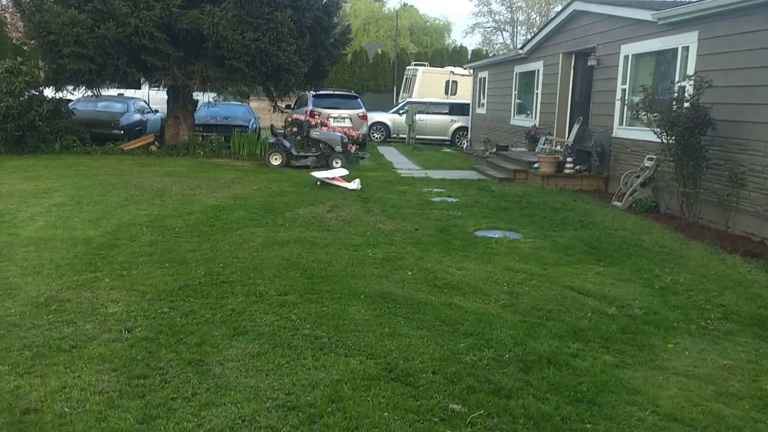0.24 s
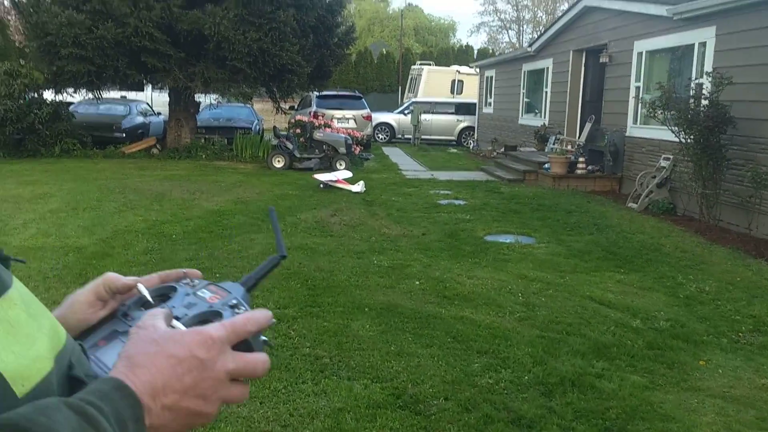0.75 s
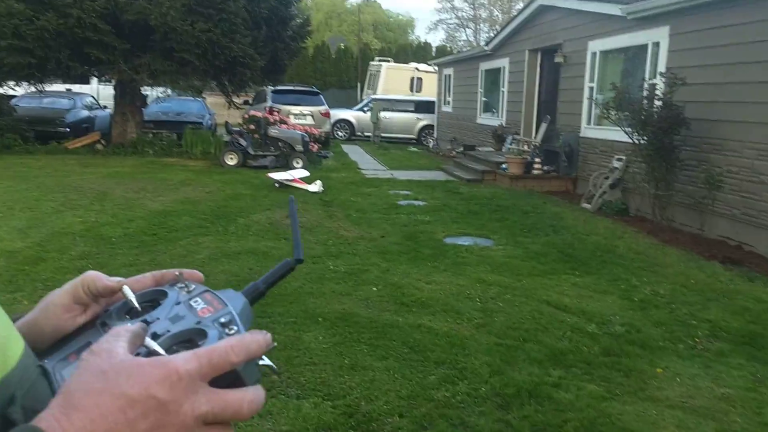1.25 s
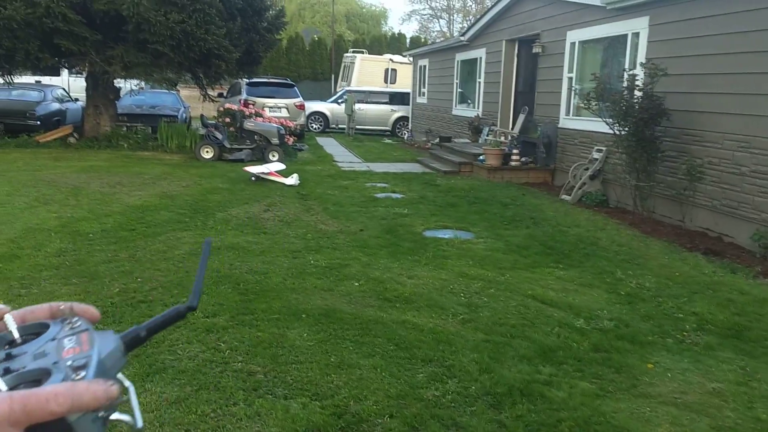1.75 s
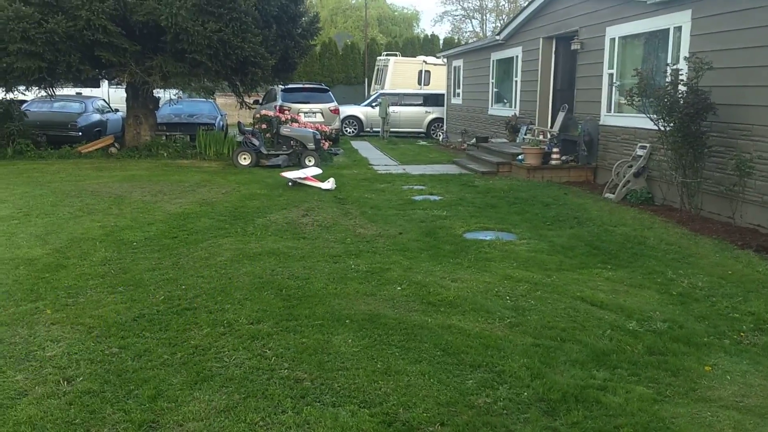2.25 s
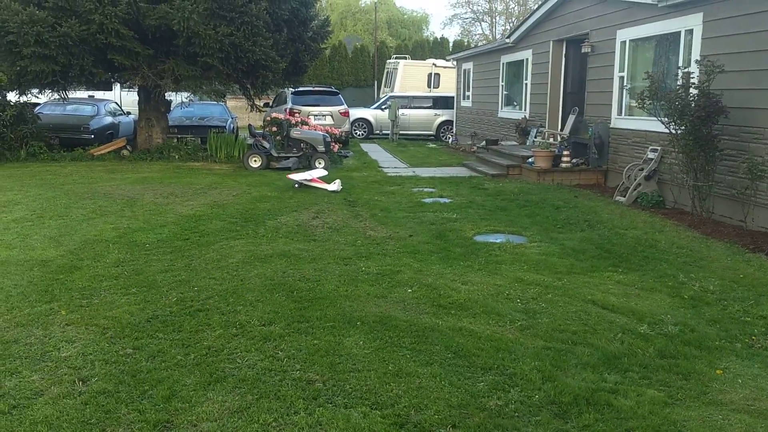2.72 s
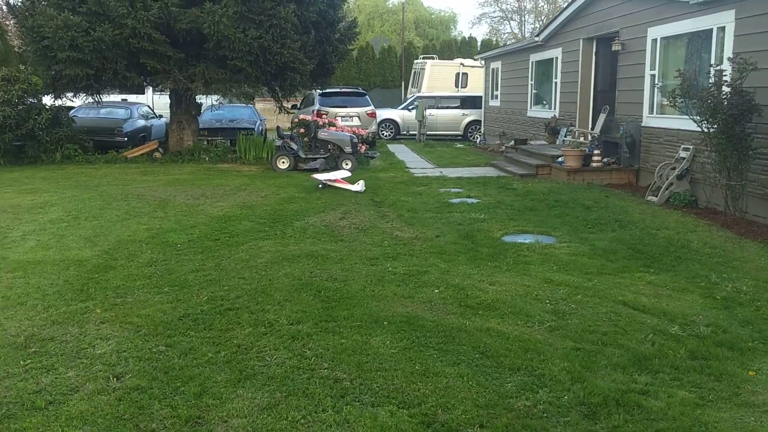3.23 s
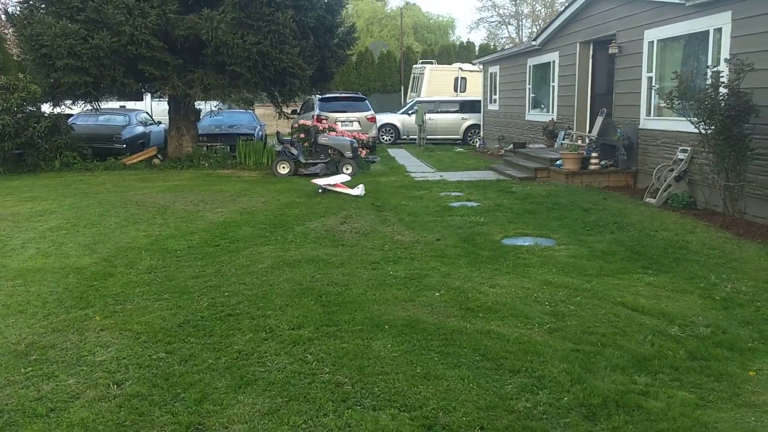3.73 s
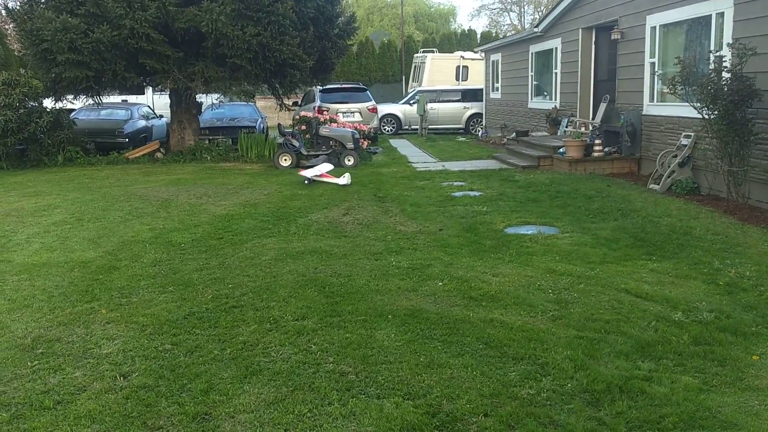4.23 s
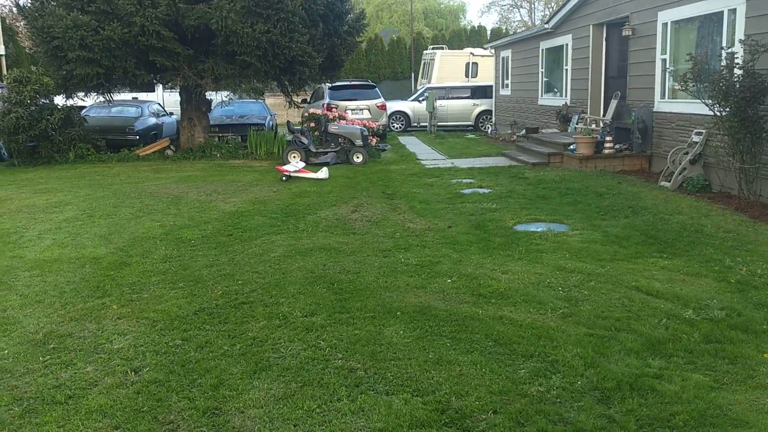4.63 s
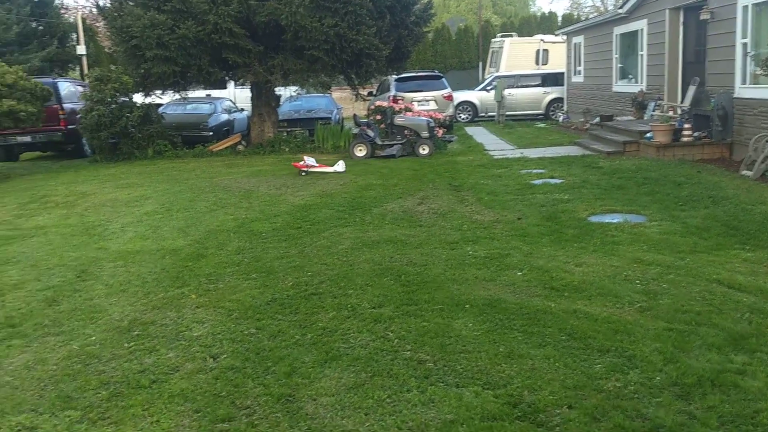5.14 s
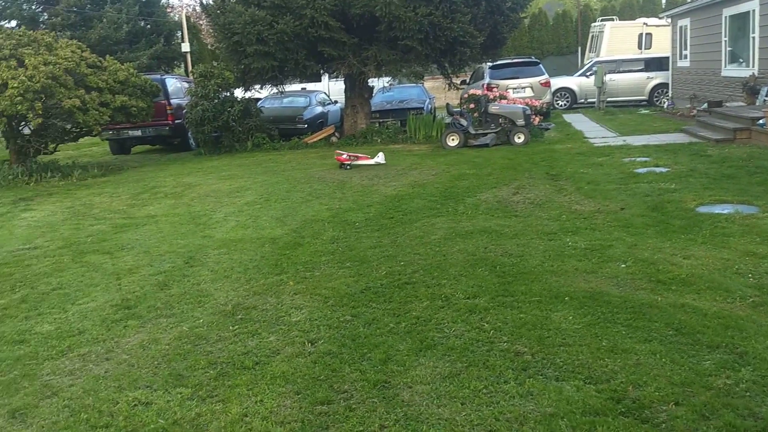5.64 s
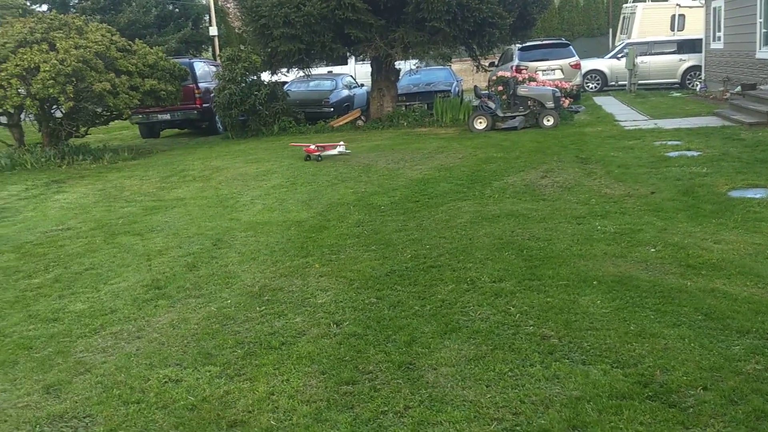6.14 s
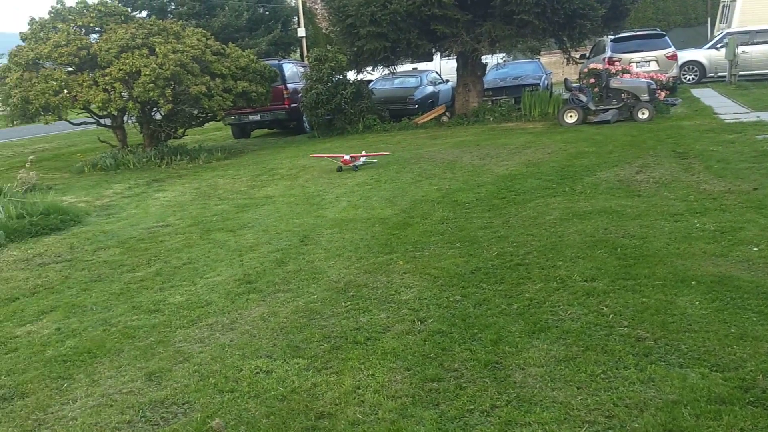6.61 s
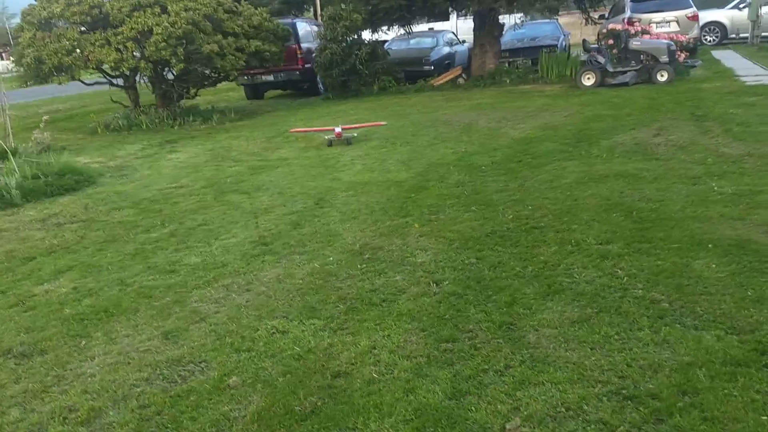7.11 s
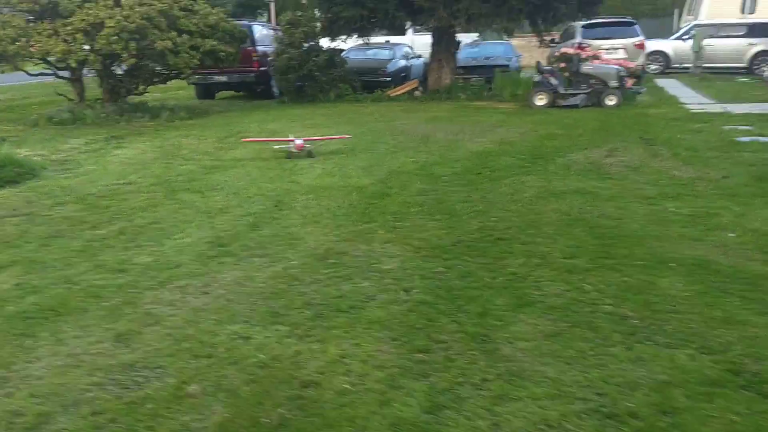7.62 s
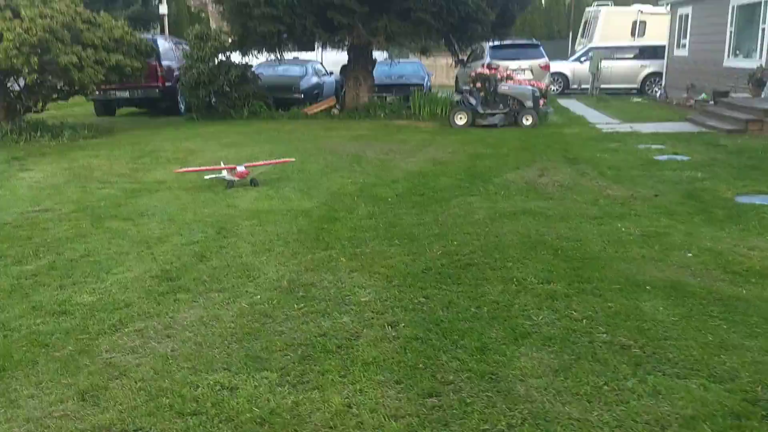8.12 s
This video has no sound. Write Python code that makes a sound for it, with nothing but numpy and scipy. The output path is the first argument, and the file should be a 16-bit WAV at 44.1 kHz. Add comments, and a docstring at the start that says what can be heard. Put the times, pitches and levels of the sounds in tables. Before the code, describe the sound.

A small electric model plane's propeller hums and buzzes with a thin high motor whine, its pitch rising and falling, while fingers knock hard on the phone.

```python
"""On a lawn, a small electric model plane stands side-on, nose turned slightly away from a hand-held phone.
It swings round to face the phone and turns past; its two-blade propeller hums, slaps the air and chops its noise.
The motor sings at multiples of shaft speed and its speed controller whines, beating with the commutation.
Fingers rub and knock on the phone, ringing its case, over brief raspy chirps and a soft outdoor rumble.
The hardest knocks make the phone's gain control duck and slowly recover."""
import sys
import numpy as np
from scipy import signal
from scipy.fft import rfft, irfft, next_fast_len
from scipy.io import wavfile
from scipy.ndimage import uniform_filter1d

SR = 44100
rng = np.random.default_rng(int(sys.argv[2]) if len(sys.argv) > 2 else 0)


def wrap_up_sound(samples):
    """Save the sound to the file named by the first command line argument, as 16-bit audio."""
    columns = np.atleast_2d(samples).T
    # keep every value between -1 and 1, then stretch to whole-number steps
    tamed = np.clip(columns, -1, 1)
    steps = np.round(tamed * 32767).astype(np.int16)
    wavfile.write(sys.argv[1], SR, steps)


N = 369116
T = np.arange(N) / SR
FREQS = np.arange(N // 2 + 1) * SR / N

# Outdoor rumble spectrum. Each row: frequency in Hz, relative level in dB.
YARD_SPECTRUM = [(25, -22.5), (45, -15), (70, 2.5), (120, -2.5), (220, 4.5), (500, -2.5), (900, -17),
                 (2000, -29.5), (6000, -46.5), (16000, -31.5)]
# Brief high chirps. Each row: peak time in seconds, peak level in dB, centre pitch in Hz.
CHIRPS = [(3.14, -51, 3400), (4.35, -35, 3470), (4.69, -37, 3520), (5.421, -35, 3470), (5.95, -36, 3600),
          (6.387, -32, 3560)]
# Finger strokes on the phone. Each row: centre in seconds, half length in seconds, level in dB.
STROKES = [(0.137, 0.035, -59), (0.55, 0.014, -57), (0.83, 0.11, -53), (0.96, 0.018, -44),
           (7.145, 0.047, -47.5), (7.492, 0.02, -48.5), (7.332, 0.043, -48), (7.538, 0.14, -50.5),
           (7.73, 0.06, -50.5), (8.2, 0.33, -59.5), (8.36, 0.033, -46)]
# Spectrum of rubbing fingers. Each row: frequency in Hz, relative level in dB.
RUBBING_SPECTRUM = [(50, -34), (200, -4.5), (400, -5), (800, 4.5), (1400, 0.5), (2500, -20.5), (6000, -19),
                    (16000, -65)]
# Spectrum of the sleeve swish. Each row: frequency in Hz, relative level in dB.
SLEEVE_SPECTRUM = [(100, -1.5), (300, 5), (1100, -2.5), (1900, -14.5), (2800, -1.5), (5000, -5),
                   (9000, -13.5), (16000, -9)]
# Knocks on the phone. Each row: start in seconds, peak level of the body in dB, body pitch in Hz, own ring in dB,
# case ring in dB, tick in dB, left minus right in dB. Rings are mixed against the push, the tick against the body.
KNOCKS = [(.105, -33, 487, -4, -12, -45, 0), (0.712, -36, 400, -8, -15, -47.5, 0),
          (0.9958, -9.5, 2900, 11, -30, -34, -11), (0.9955, -9.5, 348, -15, -24, -46, -6.5),
          (0.9947, -15.5, 990, 4, -16.5, -44, -3), (1.0079, -0.5, 640, -32, -19.5, -60.5, -6),
          (1.446, -28.5, 177, -12.5, -16, -60, -15), (1.6551, -10, 730, -26, -24, -50, 6.5),
          (6.191, -32.5, 900, -11, -15, -15, 0), (7.242, -40, 303, -5, -20, -66, 9),
          (7.2628, -14.5, 1950, -7, -49, 1.5, 3.5), (7.358, -37, 420, -13, -16, -45, 6),
          (7.534, -30, 665, -4, -20, -37, 5), (7.638, -20.5, 900, -12, -22.5, -24.5, 2.5),
          (7.7755, -21, 2180, -6, -37, 6.5, 0), (7.78, -29, 1900, 1, -31, -15, 8),
          (7.785, -31, 1500, 0, -35, -16, 5), (7.799, -24, 1700, -3, -35, -6, 0),
          (7.8029, -14, 2600, -33, -30, 0.5, -15.5), (7.816, -22, 1900, -12, -37, 7, 21),
          (7.8205, -8, 1700, -3, -48, 1, 2), (7.8438, -15.5, 455, -10, -18, 0, -16),
          (7.861, -10.5, 735, -2, -20, -22, 1), (7.868, -19.5, 350, 25, -25, -55, 6),
          (7.959, -38, 704, -8, -18, -45, -2), (8.14, -17.5, 480, -11, -28, -17, 5),
          (8.21, -34, 1100, -11, -14, -35, 2)]
# Phone case modes. Each row: pitch in Hz, relative level in dB, 60 dB decay time in seconds.
CASE_MODES = [(351, -7, 0.013), (700, -8, 0.057), (1030, 4.5, 0.091), (1630, 5, 0.15)]
# Shell modes in the tick of a knock. Each row: pitch in Hz, relative level in dB, 60 dB decay time in seconds.
SHELL_MODES = [(3100, -13.5, 0.0099), (5660, -13.5, 0.004), (10500, -17, .001), (14500, -9, 0.0012)]

# Throttle, before smoothing and wander. Each row: time in seconds, shaft speed in turns per second.
SHAFT_SPEED = [(0.0, 91.4), (0.26, 89.7), (0.72, 93.9), (1.23, 92.6), (1.68, 94.9), (2.17, 93.6),
               (2.41, 101.8), (2.68, 107.3), (2.97, 101.7), (3.48, 98.8), (3.87, 118.8), (4.14, 122.3),
               (4.4, 117.1), (4.98, 102.2), (5.16, 99.9), (5.54, 100.3), (5.94, 105.3), (6.31, 103.6),
               (6.76, 89.6), (7.2, 82.1), (7.98, 82.5), (8.37, 99.1)]
# Plane's heading. Each row: time in seconds, nose angle in degrees off the line to the phone.
NOSE_ANGLE = [(0, 128), (4.3, 102.5), (5.1, 88), (5.6, 80.5), (5.95, 46.5), (6.4, 38), (6.7, 24), (7.3, 0),
              (7.7, -3), (8.1, -20), (8.25, -28), (8.37, -46)]
# Radiation to each side at cruise speed, before mix trims. Each row: angle off the nose in degrees, blade tone in dB,
# buzz in dB, hiss in dB, cowl rasp in dB against the buzz, motor song in dB against the buzz.
DIRECTIVITY = [(0, -55, -53, -41.5, -34, -9), (19.5, -59.5, -45.5, -44.5, 5, -3),
               (35.3, -52, -46.5, -49.5, 7, 1.5), (51.6, -43, -49.5, -56, 7, 2),
               (80.6, -41, -49.5, -57, 8.5, 2.5), (114, -43, -43, -56, -20.5, -0.5)]
# Plane's place between the ears. Each row: time in seconds, left minus right in dB.
PLANE_PAN = [(0, -1), (1, -4), (1.8, -1), (3.2, -2.5), (4.7, -1), (5.7, -3.5), (6.7, -1), (7.3, -1.5),
             (8.37, -1.5)]
# Phase lead of the left port for sound from the plane. Each row: frequency in Hz, lead in radians.
LEFT_PORT_PHASE = [(0, 0), (1700, -.6), (2180, -3.14), (2750, -6), (3450, -6.4), (4330, -9.42), (8700, -22),
                   (9600, -25.1), (10300, -25.2), (10950, -28.3), (16000, -42.9)]
# Propeller harmonics. Each row: multiple of shaft speed, relative level in dB.
PROP_ORDERS = [(1, -32.5), (2, 0), (3, -10.5), (4, -21)]
# Motor song harmonics. Each row: multiple of shaft speed, relative level in dB.
MOTOR_ORDERS = [(7, -18.5), (16, -20), (17, -24.5), (18, -17.5), (21, -12.5), (22, -9), (23, -11.5),
                (25, -13.5), (26, -7), (27, -13.5), (28, -13), (29, -15.5), (30, -13.5), (31, -19.5),
                (32, -12.5), (34, -16), (35, -17), (36, -12.5), (38, -11.5), (40, -30.5), (44, -16),
                (46, -19), (48, -27.5)]
# Magnet song, centred on 14 cycles a turn. Each row: multiple of shaft speed, relative level in dB.
MAGNET_ORDERS = [(13, -9), (14, -1), (15, -9.5)]
# Magnet song over time. Each row: time in seconds, level in dB.
MAGNET_LEVEL = [(0, -69.5), (2.1, -69.5), (2.8, -61), (3.58, -65), (3.8, -47), (4.1, -45), (4.25, -46),
                (4.42, -47), (4.72, -47.5), (4.92, -61), (5.3, -66), (5.9, -61), (6.5, -61.5), (7.2, -55.5),
                (7.7, -58.5), (8.0, -55), (8.37, -53.5)]
# Drone of the middle harmonics. Each row: multiple of shaft speed, relative level in dB.
DRONE_ORDERS = [(8, -8.5), (9, -4.5), (10, -1), (11, -2.5), (12, -3.5)]
# Drone over time. Each row: time in seconds, level in dB.
DRONE_LEVEL = [(0, -69.5), (1, -74.5), (1.6, -59), (2.3, -63.5), (2.7, -61.5), (3.0, -57.5), (3.6, -58.5),
               (4.1, -69), (4.5, -65.5), (4.9, -61.5), (6.3, -61.5), (7, -67), (8.37, -64.5)]
# Foam airframe resonances. Each row: pitch in Hz, width in Hz, boost in dB mixed on top of the direct tone.
AIRFRAME = [(120.5, 5.2, 13.5), (363, 16, -1.5), (759, 19, 7.5), (935, 35, -4.5), (1596, 56, -2),
            (2420, 54, 7.5), (3410, 52, 2), (3885, 47, 3.5)]
# Pitches where reflections cancel the direct tone. Each row: pitch in Hz, width in Hz, depth in dB.
NULLS = [(224.3, 20, 8), (326, 28.5, 11)]
# Blade buzz spectrum. Each row: frequency in Hz, gain in dB.
BUZZ_SPECTRUM = [(300, -34), (650, -13.5), (1000, -14.5), (1320, -24), (1700, -6.5), (2050, -7), (2450, 3),
                 (3100, -5.5), (3800, -5), (5200, -3), (6200, -11.5), (9000, -25.5), (15000, -35)]
# Propeller wash spectrum. Each row: frequency in Hz, relative level in dB.
WASH_SPECTRUM = [(300, -15), (900, -0.5), (1300, -11.5), (1700, -2), (2100, -4.5), (2450, 3.5), (3000, -1),
                 (3600, 1.5), (4500, 2), (6000, -7), (7400, -12), (9000, -13.5), (16000, -21.5)]
# Air hiss spectrum. Each row: frequency in Hz, relative level in dB.
HISS_SPECTRUM = [(500, -21.5), (2600, 4.5), (5000, 0), (7500, -7.5), (9800, -14), (11000, -4),
                 (12700, -1.5), (14300, -5), (16000, -2.5)]
# Strips of wash that flare up: centre frequencies in Hz.
PATCH_HZ = [2600, 3200, 3500]
# Speed controller. Each row: time in seconds, switching rate in Hz.
SWITCHING_RATE = [(0.0, 7831.5), (2.38, 7813), (6.2, 7819.5), (6.36, 7851), (8.37, 7843)]
# Controller whine before flutter. Each row: time in seconds, level in dB.
WHINE_LEVEL = [(0, -58), (.2, -55.5), (.45, -64.5), (.75, -47.5), (1, -62), (2, -54.5), (2.5, -61),
               (2.9, -58.5), (3.15, -51), (3.6, -54), (3.9, -59), (4.15, -52.5), (4.7, -55), (5.15, -50.5),
               (5.5, -55.5), (5.8, -50.5), (6.2, -54), (6.35, -49), (6.7, -44.5), (7, -52.5), (7.75, -53.5),
               (8.1, -44.5), (8.37, -49.5)]
# Commutation whistle before flutter. Each row: time in seconds, level in dB.
WHISTLE_LEVEL = [(0, -55.5), (2.1, -64), (2.4, -61), (2.7, -49), (3.1, -56), (3.5, -54), (3.7, -45.5),
                 (4.2, -59), (4.7, -52.5), (5.2, -59), (5.75, -47.5), (6.05, -46.5), (6.5, -75), (7.1, -53),
                 (7.6, -53), (8.05, -51.5), (8.37, -59)]

SPIN_UP_S, CRUISE_HZ = .15, 100  # throttle smoothing window; reference shaft speed
TONE_DB_PER_OCT, BUZZ_DB_PER_OCT, HISS_DB_PER_OCT = 31, 19.5, 14.5  # growth with shaft speed
CHOP, CHOP_SCATTER_DB = .32, 2  # depth of blade chopping heard side-on; its quick scatter in the wash
COMMUTATIONS_PER_TURN = 42
GRIP_DB = -61.5  # the resting hand
SWISH_S, SWISH_HALF_S = .955, .024
RING_CYCLES = 17  # a struck spot falls 60 dB in this many cycles of its own pitch
OPEN_HZ = 5060  # extra treble reach of the hardest contact
TOP_HZ = 15850  # upper limit of the phone


def undb(db):
    """Decibels to gain."""
    return 10 ** (np.asarray(db) / 20)


def curve(table):
    """Glide through a table of (time, value), sample by sample."""
    s, value = np.transpose(table)
    return np.interp(T, s, value)


def walk(rate):
    """Smooth random wander with a spread near 1, taking `rate` new values a second."""
    step = int(SR / rate)
    held = np.repeat(rng.standard_normal(N // step + 2), step)
    held = held[rng.integers(step):][:N]
    return 1.353 * uniform_filter1d(uniform_filter1d(held, step), step)


def swell(s, half_length_s):
    """Bell-shaped envelope around time s."""
    return np.exp(-((T - s) / half_length_s) ** 2)


def colour(x, spectrum):
    """Filter x by a curve of (Hz, dB) points, then bring it to rms 1."""
    size = next_fast_len(N, True)
    hz, db = np.transpose(spectrum)
    bins_hz = np.arange(size // 2 + 1) * SR / size
    gain = undb(np.interp(np.log(bins_hz + 1), np.log(hz), db))
    y = irfft(rfft(x, size) * gain, size)[..., :N]
    return y / np.sqrt(np.mean(y ** 2))


def band(x, lo_hz, hi_hz):
    """Four-pole band-pass."""
    edges = [lo_hz, min(hi_hz, SR / 2 - 100)]
    return signal.sosfilt(signal.butter(2, edges, "band", fs=SR, output="sos"), x)


def air(spread):
    """Noise at two ports: a common part and a part of their own."""
    return rng.standard_normal(N) + spread * rng.standard_normal((2, N))


def add(out, s, sound):
    """Mix a sound in at time s."""
    start = int(s * SR)
    out[..., start:start + sound.shape[-1]] += sound[..., :N - start]


def yard(level_db):
    """Soft, distant outdoor rumble; moving air stirs each port on its own."""
    return undb(level_db + 0.57 * walk(4.1)) * colour(air(26.0), YARD_SPECTRUM)


def chirps(length_s, width_hz):
    """Brief, slightly raspy chirps: narrow noise under a quick rise and decay."""
    out, t = np.zeros(N), T[:SR // 15]
    for s, peak_db, hz in CHIRPS:
        rasp = band(rng.standard_normal(len(t)), hz - width_hz, hz + width_hz)
        chirp = rasp * t * np.exp(-t / length_s)
        add(out, s - length_s, undb(peak_db) * chirp / abs(chirp).max())
    return out


def handling(swish_db):
    """Fingers slide in uneven grains of noise; a sleeve swishes past just before the first big knock."""
    pressure = undb(GRIP_DB) + sum(undb(db) * swell(s, half_s) for s, half_s, db in STROKES)
    rub = pressure * colour(air(0.22) * undb(3.0 * walk(130)), RUBBING_SPECTRUM)
    cloth = colour(air(0.36) * undb(1.2 * walk(320)), SLEEVE_SPECTRUM)
    return rub + undb(swish_db) * swell(SWISH_S, SWISH_HALF_S) * cloth


def modes(table, t):
    """Decaying sines of a struck object."""
    return sum(undb(db - 60 * t / t60) * np.sin(2 * np.pi * hz * t) for hz, db, t60 in table)


def knocks(lag_s):
    """A short push rings at its own pitch and in the case, with a shell tick; the left port hears it later."""
    out, t = np.zeros((2, N)), T[:SR // 10]
    impulse = signal.unit_impulse(len(t))
    tick = impulse + modes(SHELL_MODES, t)
    case = modes(CASE_MODES, t)
    for s, peak_db, hz, own_db, case_db, tick_db, pan_db in KNOCKS:
        # a soft fingertip cushions the treble
        reach_hz = hz * 2 + OPEN_HZ * undb(min(tick_db, 0))
        push = band(band(impulse, hz / 3, hz * 1.92), 90, reach_hz)
        own = band(modes([(hz, 0, RING_CYCLES / hz)], t), hz / 3, hz * 2)
        ring = signal.fftconvolve(push, case)[:len(t)]
        body = push / abs(push).max() + undb(own_db) * own + undb(case_db) * ring / abs(ring).max()
        blow = body / abs(body).max() + undb(tick_db) * tick
        late = np.pad(blow, (int(lag_s * SR), 0))[:len(t)]
        gains = undb(peak_db + np.array([[pan_db], [-pan_db]]) / 2)
        add(out, s, gains * np.array([late, blow]))
    return out


def controller(turns, side_on):
    """Switched current whines, ripples with the shaft and beats with the whistle of the commutations."""
    carrier = 2 * np.pi * np.cumsum(curve(SWITCHING_RATE)) / SR
    angle = 2 * np.pi * turns
    commutation = COMMUTATIONS_PER_TURN * angle
    beat = carrier - 2 * commutation
    ripple = 1 + 0.24 * np.cos(angle) + 0.31 * np.cos(2 * angle) + 0.21 * walk(150)

    whine_gain = undb(curve(WHINE_LEVEL) + 1.0 * walk(6) + 1.7 * walk(25))
    whine = whine_gain * ripple * np.sin(carrier + 0.27 * walk(19))
    whistle = undb(curve(WHISTLE_LEVEL) + 2.8 * walk(40)) * np.sin(commutation)
    # the difference tone drops as the shaft speeds up
    falling = undb(-61 + 3 * side_on + 1.6 * walk(9.3)) * np.sin(carrier - commutation)
    falling = band(falling, 3350, 3700)
    climbing = band(undb(-51 + 1.2 * walk(18)) * np.sin(beat), 1620, 2200)
    overtone = band(undb(-61.5 + 2 * walk(14)) * np.sin(2 * beat), 1680, 3800)
    return np.sqrt(2) * (whine + ripple * (whistle + falling + climbing + overtone))


def patches(x, depth_db, width_hz):
    """Neighbouring strips of noise brighten and fade, each on its own."""
    out = x
    for hz in PATCH_HZ:
        flare = undb(depth_db * walk(11)) - 1
        out = out + flare * band(x, hz - width_hz / 2, hz + width_hz / 2)
    return out


def echoes(x, echo_db, drift_s):
    """House wall and parked cars reflect the plane; the paths drift, so each partial fades on its own."""
    delays_s = [.011, .027, .043]
    return x + undb(echo_db) * sum(np.interp(T - d - drift_s * walk(1.436), T, x) for d in delays_s)


def buzz(turns, cowl_db, weak_blade, cowl_weak_blade, cowl_hz, cowl_width_hz):
    """Each blade slaps the air once a turn, one harder; the cowl rasps mostly to the harder slap."""
    def slap(lead):
        return np.exp(-(((turns + lead) % 1 - .5) / 0.0042) ** 2)

    def slaps(weak):
        uneven = 1 + .3 * walk(250)
        return echoes((slap(0) + weak * slap(.5)) * uneven, echo_db=-1.0, drift_s=.00005)

    rasp = band(slaps(cowl_weak_blade), cowl_hz - cowl_width_hz / 2, cowl_hz + cowl_width_hz / 2)
    return colour(slaps(weak_blade), BUZZ_SPECTRUM) + undb(cowl_db) * rasp / rasp.std()


def tones(orders, turns, shaft_hz, waver_db):
    """Shaft harmonics, each swelling as it sweeps through an airframe resonance and sinking in a null."""
    out = 0
    for multiple, db in orders:
        k = round(multiple)
        tone_hz = k * shaft_hz

        def nearness(hz, width):
            return 1 / (1 + (2 * (tone_hz - hz) / width) ** 2)

        boost = 1 + sum(undb(peak_db) * nearness(hz, width) for hz, width, peak_db in AIRFRAME)
        dip_db = sum(depth_db * nearness(hz, width) for hz, width, depth_db in NULLS)
        gain = boost * undb(db - dip_db + waver_db * walk(13))
        out = out + gain * np.sin(2 * np.pi * (k * turns + rng.random()))
    return np.sqrt(2) * out


def plane():
    """Propeller, motor and chopped air follow shaft speed and heading; the left port hears them phase-shifted."""
    window = int(SPIN_UP_S * SR)
    shaft_hz = uniform_filter1d(curve(SHAFT_SPEED), window, mode="nearest") * (1 + 0.001185 * walk(20))
    turns = np.cumsum(shaft_hz) / SR
    octaves = np.log2(shaft_hz / CRUISE_HZ)
    off_nose = abs(curve(NOSE_ANGLE))
    side_on = abs(np.sin(np.radians(off_nose))) ** 3

    degrees, *columns = np.transpose(DIRECTIVITY)
    tone_db, buzz_db, hiss_db, cowl_db, song_db = (np.interp(off_nose, degrees, c) for c in columns)
    tone_db = tone_db + TONE_DB_PER_OCT * octaves
    buzz_db = buzz_db + BUZZ_DB_PER_OCT * octaves
    hiss_db = hiss_db + HISS_DB_PER_OCT * octaves

    # the blade tone is steadier than the other propeller harmonics
    hum = undb(tone_db - 1.0) * tones(PROP_ORDERS[1:2], turns, shaft_hz, waver_db=0.97)
    hum += undb(tone_db - 1.5) * tones(PROP_ORDERS[:1] + PROP_ORDERS[2:], turns, shaft_hz, waver_db=3.0)
    magnets = undb(curve(MAGNET_LEVEL)) * tones(MAGNET_ORDERS, turns, shaft_hz, waver_db=1.2)
    drone = undb(curve(DRONE_LEVEL)) * tones(DRONE_ORDERS, turns, shaft_hz, waver_db=2.5)
    motor = undb(song_db - 8.0) * tones(MOTOR_ORDERS, turns, shaft_hz, waver_db=3.5)
    slaps = undb(-5.5) * buzz(turns, cowl_db, weak_blade=0.75, cowl_weak_blade=0.14,
                              cowl_hz=2573, cowl_width_hz=530)

    # turbulence pulses as each blade swings towards the phone
    chop = 1 + CHOP * side_on * np.cos(4 * np.pi * turns)
    gusts = chop * undb(CHOP_SCATTER_DB * walk(260))
    wash = patches(colour(air(0.056) * gusts, WASH_SPECTRUM), depth_db=2.6, width_hz=420)
    wash = undb(-4.3 + 1.1 * walk(22)) * wash
    hiss = undb(hiss_db + 3.0 + 0.4 * walk(6.0)) * colour(air(0.054) * chop, HISS_SPECTRUM)

    sound = hum + magnets + drone + undb(buzz_db) * (motor + slaps + wash) + hiss
    sound = sound + controller(turns, side_on)
    phase = np.interp(FREQS, *np.transpose(LEFT_PORT_PHASE))
    left = irfft(rfft(sound[0]) * np.exp(1j * phase), N)
    pan_db = curve(PLANE_PAN)
    return np.array([left, sound[1]]) * undb(np.array([pan_db, -pan_db]) / 2)


def scene():
    """Mix the yard, the chirps, the hands on the phone and the plane."""
    return (yard(level_db=-55) + chirps(length_s=0.0041, width_hz=185) + handling(swish_db=-35.5)
            + knocks(lag_s=.00013) + plane())


def record(dry):
    """Gain control reacts late to peaks and recovers steadily; what gets past it clips; the top is cut."""
    # the microphone's wind filter, 75 Hz
    dry = signal.sosfilt(signal.butter(2, 75, "high", fs=SR, output="sos"), dry)
    threshold_db, recovery_db_per_s, lag_s = -16.5, 15.5, .0205
    over_db = np.maximum(20 * np.log10(abs(dry).max(axis=0) + 1e-9) - threshold_db, 0)
    # hold each peak, letting go at a steady rate
    release_db = recovery_db_per_s * T
    duck_db = np.maximum.accumulate(over_db + release_db) - release_db
    duck_db = uniform_filter1d(np.pad(duck_db, (int(lag_s * SR), 0))[:N], size=150)
    clipped = np.clip(dry * undb(-duck_db), -1, 1)
    return signal.sosfilt(signal.ellip(10, .2, 70, TOP_HZ, fs=SR, output="sos"), clipped)


dry = scene()
out = record(dry)
wrap_up_sound(out)
```